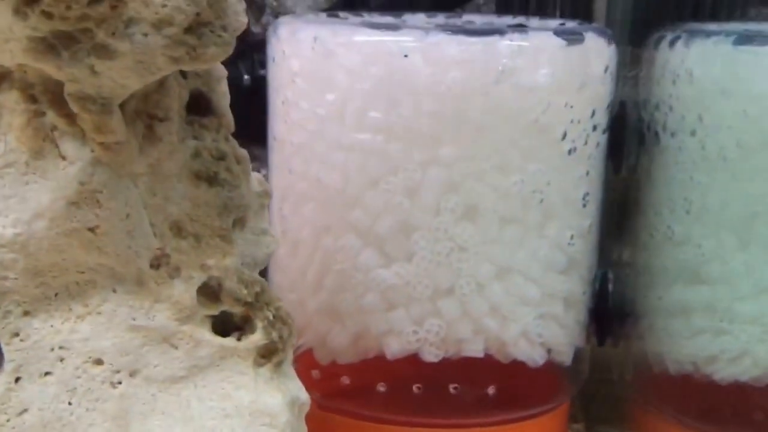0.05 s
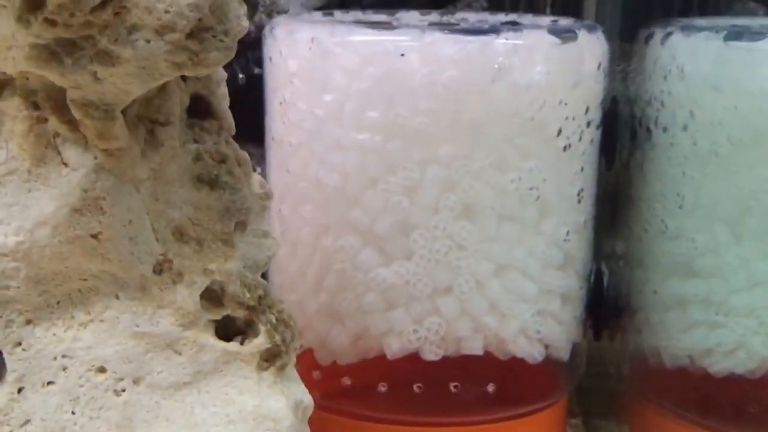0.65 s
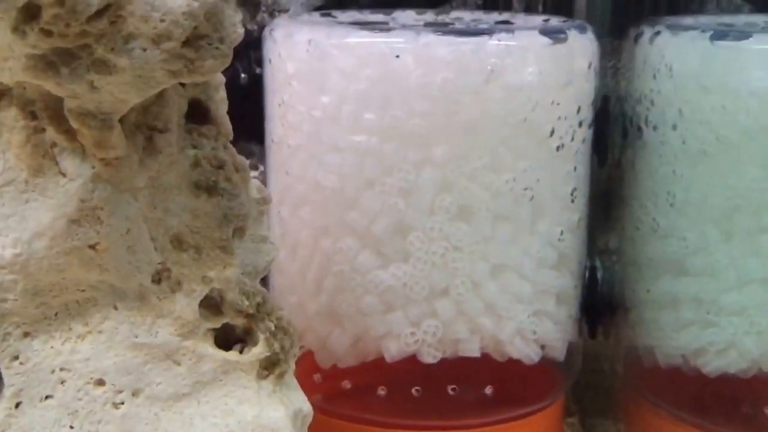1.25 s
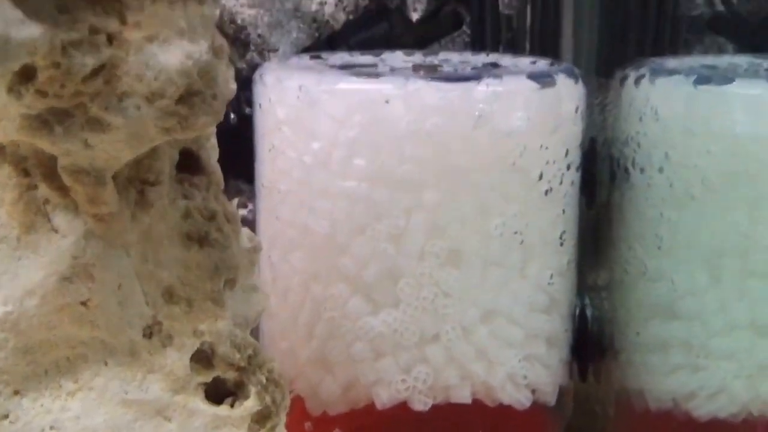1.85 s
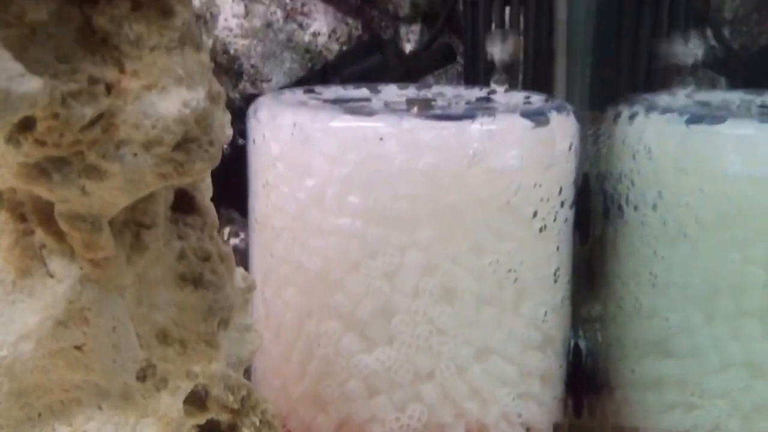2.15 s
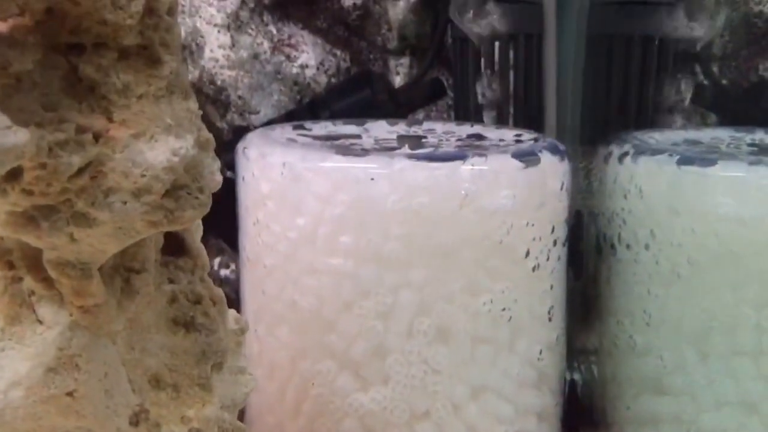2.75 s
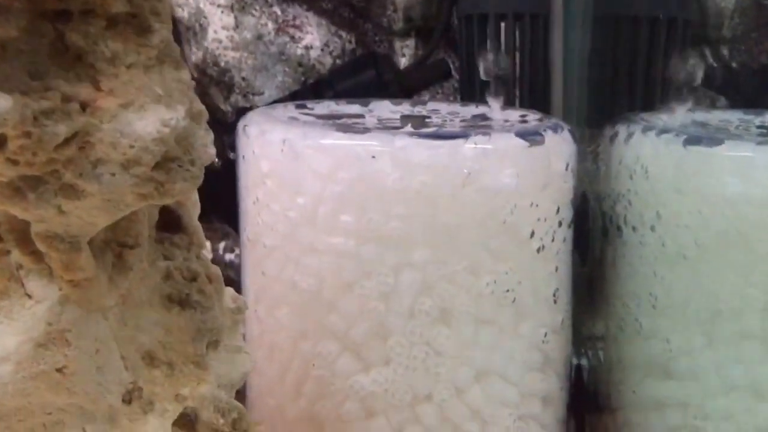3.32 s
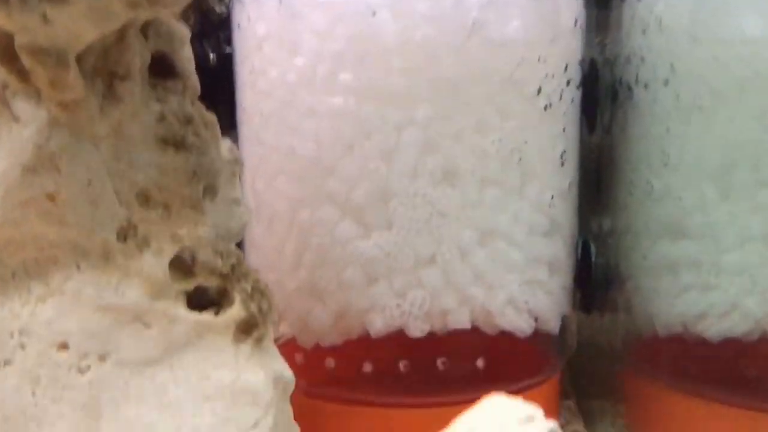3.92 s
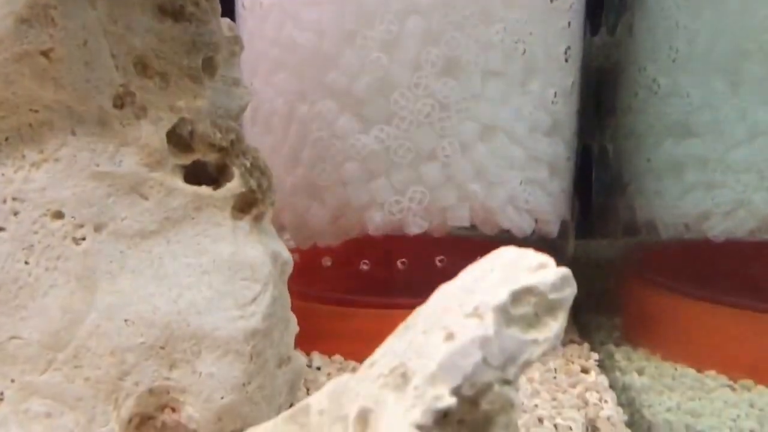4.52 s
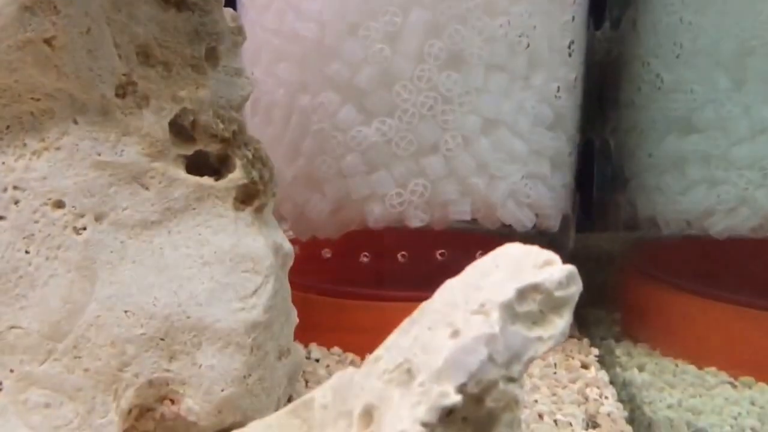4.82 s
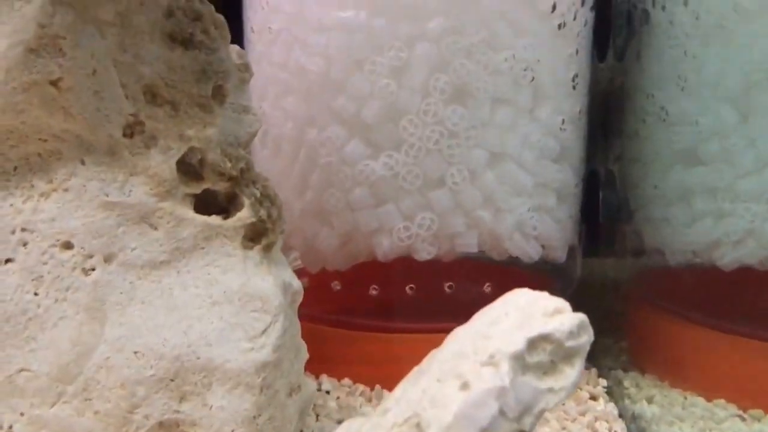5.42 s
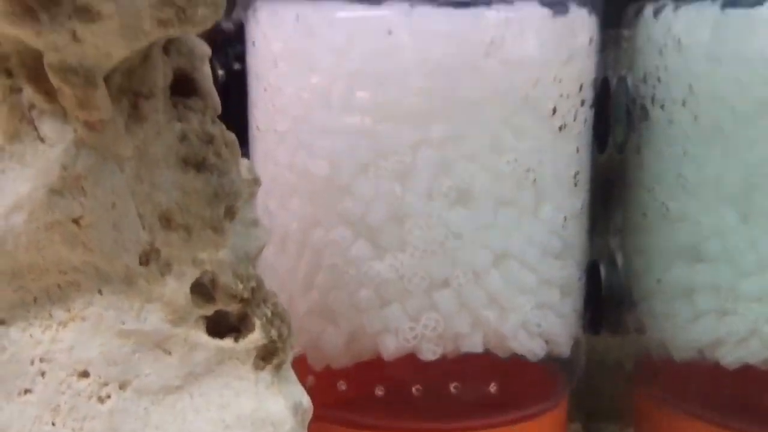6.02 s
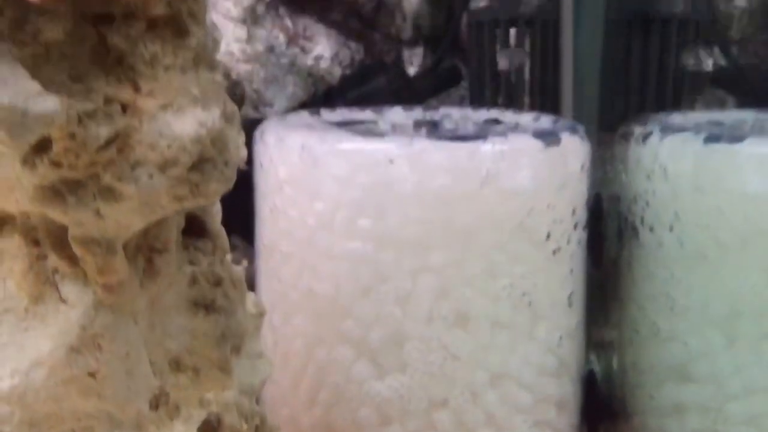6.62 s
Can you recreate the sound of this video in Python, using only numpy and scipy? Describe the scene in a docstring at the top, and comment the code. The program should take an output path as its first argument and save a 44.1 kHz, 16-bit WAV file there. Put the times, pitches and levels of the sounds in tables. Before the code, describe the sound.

Close drips and bubbles plink in a fish tank while water churns through the filter and a pump hums low in a quiet room.

```python
"""A quiet room, one microphone close to an aquarium with its filter running.
The mains pump hums, throbs and buzzes faintly through the glass. Drips and bursting bubbles plink
in the tank, and one pops with a sharp snap. Water glugs, gurgles and trickles through the filter,
each bubble ringing as a short damped tone. A faint even hiss lies behind it all."""
import sys
import numpy as np
from scipy import signal
from scipy.fft import rfft, irfft, next_fast_len
from scipy.io import wavfile
from scipy.ndimage import map_coordinates

SR = 44100
rng = np.random.default_rng(int(sys.argv[2]) if len(sys.argv) > 2 else 0)


def persist_wave(psi):
    """Save psi, clipped to +-1, as 16-bit WAV."""
    counts = np.round(np.clip(psi, -1, 1) * 32767).astype(np.int16)
    wavfile.write(sys.argv[1], SR, np.atleast_2d(counts).T)


N = 293789

MAINS_HZ, DRONE_DB, WAVER_HZ = 49.93, -41.5, 116.5
# The pump through the glass, low hum and higher buzz: multiple of the mains frequency, level/dB
HUM_PARTIALS = [(1, -65), (3, -59.5), (5, -71), (6, -70.5), (7, -76.5)]
BUZZ_PARTIALS = [(12, -81.5), (14, -77), (15, -82), (17, -84.5), (18, -81), (20, -78), (21, -80), (23, -80),
                 (24, -69.5), (25, -79), (26, -74.5), (27, -81), (41, -83), (42, -93.5), (43, -92)]
def pump():
    """Mains hum, strongest at twice the mains rate; a wavering tone just above it beats against it."""
    t = np.arange(N) / SR
    turn = 2 * np.pi * MAINS_HZ * t + 0.0093 * wobble(2.0)
    tone = lambda order: np.sqrt(2) * np.sin(order * turn + 2 * np.pi * rng.random())
    drone_db = DRONE_DB - hum_dips()
    drone = amp(drone_db) * tone(order=2)
    partials = sum(amp(db + 1.1 * wobble(6)) * tone(order) for order, db in HUM_PARTIALS + BUZZ_PARTIALS)
    waver = amp(1.6 * wobble(6)) * np.sin(2 * np.pi * WAVER_HZ * t + .9 * wobble(4))
    throb = amp(drone_db - 10) * waver
    return drone + partials + throb


# Brief dips in the pump's main hum: t/s, depth/dB, recovery/s
HUM_DIPS = [(.433, 12, 0.068), (.635, 14, 0.093), (1.11, 5.5, 0.032), (1.45, 14, 0.01), (1.585, 15, .012)]
def hum_dips(fall_s=0.011):
    """How many dB the main hum is down: each dip falls quickly, then recovers."""
    t = np.arange(N) / SR
    return sum(depth * np.exp(-((t - s) / np.where(t < s, fall_s, recovery)) ** 2)
               for s, depth, recovery in HUM_DIPS)


# Drips in the tank, close to the microphone: t/s, level/dB, f/Hz, length/s
TANK_DRIPS = [(0.029, -39.5, 1968, 0.012), (.762, -59, 2224, 0.026), (0.975, -34.5, 2010, 0.0038),
              (1.026, -50, 2267, 0.017), (1.089, -55, 2470, .012), (1.144, -45, 3600, 0.0069),
              (1.3264, -47, 2530, 0.013), (1.3337, -36.5, 1840, 0.015), (1.671, -45, 1320, .009),
              (1.769, -63, 5220, 0.0092), (1.845, -60, 3020, .012), (2.147, -49.5, 3346, 0.0083),
              (2.825, -48.5, 1990, 0.026), (3.026, -51, 2380, 0.018), (3.057, -58, 1592, 0.037),
              (3.689, -49, 2800, 0.013), (3.928, -56, 3210, 0.016), (4.215, -38, 2290, 0.0091),
              (4.409, -46.5, 3350, .009), (4.477, -57, 1800, .015), (4.511, -53.5, 2230, 0.014),
              (4.570, -60, 3140, .015), (4.718, -53, 1430, .013), (4.776, -55.5, 1793, .026),
              (4.815, -46.5, 1940, 0.011), (4.964, -55.5, 6850, .0044), (5.140, -50, 1858, 0.016),
              (5.723, -54.5, 2060, 0.01), (6.038, -53, 1420, 0.014), (6.394, -53.5, 3090, 0.014),
              (6.45, -53, 2513, 0.02)]
def drips():
    """Drips plink in the tank, with faint droplets between them."""
    return plinks(TANK_DRIPS + droplets(), splash=0.45)


# Spectrum of a drip's splash on the surface: f/Hz, relative level/dB
SPLASH_SPECTRUM = [(3000, -1), (5000, 3), (9000, -6), (13000, -5), (15700, -7)]
def splashes(t60_s=0.039, full_hz=3100, db_per_octave=21):
    """Each drip hits the surface with a short bright splash, strongest for the small high ones."""
    envelope, t = np.zeros(N), np.arange(SR // 20) / SR
    for s, db, hz, _ in TANK_DRIPS:
        low_pitch_db = db_per_octave * min(np.log2(hz / full_hz), 0)
        add(envelope, s, amp(db - 17 + low_pitch_db - 60 * t / t60_s))
    return envelope * noise(SPLASH_SPECTRUM)


def droplets(per_s=3, centre_hz=1518, length_s=0.012):
    """Rows of faint droplets at random moments, more of them when the trickle is strong."""
    chance = np.cumsum(amp(curve(TRICKLE_LEVEL)))
    rows = []
    for when, softness, pitch in rng.uniform(-1, 1, (int(per_s * N / SR), 3)):
        s = np.searchsorted(chance, chance[-1] * abs(when)) / SR
        rows.append((s, -63 - 1.5 * softness, centre_hz * 2 ** (0.067 * pitch), length_s))
    return rows


# Air pockets inside the filter: t/s, level/dB, f/Hz, length/s
FILTER_GLUGS = [(.674, -44.5, 628, 0.013), (.980, -48, 606, 0.014), (1.296, -52.5, 656, .025),
                (1.970, -40, 268, 0.0093), (2.264, -52, 588, 0.016), (2.425, -42.5, 264, 0.016),
                (2.469, -37.5, 278, 0.0096), (2.760, -38, 257, 0.0087), (2.785, -48, 576, 0.022),
                (3.060, -54.5, 610, 0.041), (3.298, -48, 603, 0.015), (4.324, -41.5, 367, .007)]
def glugs():
    """Big air pockets ring low and briefly."""
    return plinks(FILTER_GLUGS, splash=.35)


def plinks(rows, splash, sag_octaves=0.1, attack_s=0.0012, typical_length_s=0.013):
    """For each row a bubble sings and sags in pitch; the splash around it roughens and widens the tone."""
    out, n = np.zeros(N), np.arange(SR // 12)
    t = n / SR
    onset = 1 - np.exp(-t / attack_s)
    for s, db, hz, length in rows:
        age = t / length
        unrest = min(typical_length_s / length, 1)  # long-ringing bubbles are steadier and purer
        pitch = hz * 2 ** (-sag_octaves * unrest ** 2 * (np.minimum(age, 1.2) - .35))
        phase = 2 * np.pi * np.cumsum(pitch) / SR
        jitter = [np.interp(t * hz * 0.365, n, knots) for knots in rng.standard_normal((2, len(n)))]
        noise_band = jitter[0] * np.sin(1.06 * phase) + jitter[1] * np.cos(1.06 * phase)
        tone = np.sin(phase) + splash * np.sqrt(unrest) * noise_band
        add(out, s, amp(db) * onset * np.exp(-.5 * age - age ** 4) * tone)
    return out


# Bubble films bursting at the surface: t/s, level/dB
FILM_SNAPS = [(.590, -64), (0.629, -67), (0.9658, -47.5), (0.9762, -46.5)]
# Their spectrum: f/Hz, relative level/dB
SNAP_SPECTRUM = [(1500, -17), (4500, -14), (5600, -2), (7200, 0), (8600, 6.5), (10500, -4.5), (12000, -3),
                 (13300, -22), (16000, -18)]
def snaps(t60_s=.018):
    """A tearing bubble film gives a bright tick of a few milliseconds."""
    envelope, t = np.zeros(N), np.arange(SR // 20) / SR
    for s, db in FILM_SNAPS:
        add(envelope, s, amp(db - 60 * t / t60_s))
    return envelope * noise(SNAP_SPECTRUM)


# How hard the water churns inside the filter: t/s, relative level/dB
CHURN_LEVEL = [(0, 1.5), (.7, 0), (1.3, 3), (1.8, -1.5), (3.1, 1), (4.1, -0.5), (4.6, 0.5), (5.6, -2),
               (6.3, 2.5), (6.66, 0.5)]
# Spectrum of its rush: f/Hz, relative level/dB
RUSH_SPECTRUM = [(20, -26), (32, -16), (42, 6.5), (65, 8), (105, 8), (135, 7), (160, 2), (215, -0.5),
                 (300, -17), (400, -7), (490, -13.5), (620, -15.5), (820, -21.5), (970, -13.5),
                 (1400, -25.5), (2500, -34.5)]
def gurgle():
    """Churning water makes a soft rush and three sizes of bubbles, louder as the churning grows."""
    churn_db = curve(CHURN_LEVEL)
    rush = amp(-54.0 + .3 * churn_db + 1.25 * wobble(9)) * noise(RUSH_SPECTRUM)
    large = bubbles(per_s=130, centre_hz=235, spread=.25, cycles=3, size_db=2.8)
    middling = bubbles(per_s=150, centre_hz=619.8, spread=0.089, cycles=5.8, size_db=2.5)
    small = bubbles(per_s=100, centre_hz=1057, spread=0.2006, cycles=7.8, size_db=4.0)
    return (rush + amp(-59.0 + .3 * churn_db) * large + amp(-68.0 + churn_db) * middling
            + amp(-70.5 + 0.19 * churn_db) * small)


# The trickle on the tank's surface, faint at the microphone: t/s, level/dB
TRICKLE_LEVEL = [(0, -74), (.5, -69.5), (.76, -66), (1.3, -68), (1.6, -72.5), (3, -71.5), (3.8, -71.5),
                 (4.5, -69), (5.3, -79), (6.66, -72)]
def trickle():
    """A thin stream patters, fizzes and rings the tank; at its strongest it throws a bright spray."""
    strength_db = curve(TRICKLE_LEVEL)
    patter = bubbles(per_s=420, centre_hz=2113, spread=0.344, cycles=3.9, size_db=4)
    fizz = noise([(900, -4), (1500, -10.5), (3500, -10), (6000, -9)])
    spray = bubbles(per_s=240, centre_hz=3323, spread=0.039, cycles=14, size_db=1)
    spray_db = -73.0 + 3.9 * (strength_db - strength_db.max())
    return amp(strength_db) * unit(tank(patter + fizz)) + amp(spray_db) * spray


def bubbles(per_s, centre_hz, spread, cycles, size_db):
    """A swarm of bubbles at rms 1: damped tones that rise a little as they fade."""
    total = int(per_s * N / SR)
    when, size = rng.random((total, 2)).T
    hz = centre_hz * np.exp(spread * rng.standard_normal((total, 1)))
    n = np.arange(SR // 25)
    age = hz * n / SR / cycles
    envelope = np.exp(-age) * (1 - np.exp(-4 * age))
    ring = envelope * np.sin(2 * np.pi * cycles * age * (1 + 0.021 * age))
    gain = amp(size_db * np.minimum(-np.log(1 - size), 3.5))
    index = (when * N).astype(int)[:, None] + n
    return unit(np.bincount(index.ravel(), (gain[:, None] * ring).ravel(), N)[:N])


# Resonances of the tank: f/Hz, width/Hz, relative level/dB
TANK_MODES = [(1433, 95, 1.5), (1843, 100, -1), (2250, 480, -7), (3040, 710, -8)]
def tank(x):
    """The tank rings at a few damped resonances."""
    return filtered(x, lambda hz: sum(amp(db) * 1j * hz * width / (f ** 2 - hz ** 2 + 1j * hz * width)
                                      for f, width, db in TANK_MODES))


def glass(x, copies=8):
    """Close glass walls send back quick copies, each wavering as the water moves."""
    out = np.zeros(N)
    for delay_s in rng.uniform(0.00105, .013, copies):
        out += np.pad(x, (round(delay_s * SR), 0))[:N] * wobble(5) * np.exp(-delay_s / .02)
    return out


# Decay of the room around the microphone: f/Hz, t60/s
ROOM_DECAY = [(200, 0.44), (2000, 0.23), (10000, 0.049)]
def room(x):
    """A short diffuse tail, each frequency dying at its own speed."""
    hz, t, spectra = signal.stft(rng.standard_normal(SR // 2), SR, nperseg=256)
    tail = signal.istft(spectra * amp(-60 * t / along(ROOM_DECAY, hz)[:, None]), SR, nperseg=256)[1]
    return signal.fftconvolve(x, tail / np.linalg.norm(tail))[:N]


# Background at the microphone: f/Hz, relative level/dB
HISS_SPECTRUM = [(300, 3), (1300, 2.5), (1650, 2.5), (2300, 2), (2900, -1), (3600, 0.5), (4800, -5.5),
                 (5600, -3), (7600, -7.5), (9000, -6), (10500, -14.5), (11300, -10), (15700, -15.5)]
def hiss():
    """A faint even hiss."""
    return amp(-66.5) * noise(HISS_SPECTRUM)


def amp(db):
    """Decibels to gain."""
    return 10 ** (np.asarray(db) / 20)


def unit(x):
    """Scale to rms 1."""
    return x / np.sqrt(np.mean(x ** 2) + 1e-20)


def along(points, hz):
    """(f/Hz, value) points read on a log axis."""
    f, values = np.transpose(points)
    return np.interp(np.log(hz + 1), np.log(f + 1), values)


def curve(rows):
    """(t/s, value) rows, one value per sample."""
    return np.interp(np.arange(N) / SR, *np.transpose(rows))


def wobble(rate):
    """A smooth random curve, rate knots a second."""
    return map_coordinates(rng.standard_normal(int(N * rate / SR) + 4), [np.arange(N) * rate / SR])


def filtered(x, response):
    """Filter x by a response of frequency."""
    size = next_fast_len(N + SR // 2)
    return irfft(rfft(x, size) * response(np.fft.rfftfreq(size, 1 / SR)), size)[:N]


def noise(spectrum):
    """Coloured noise of rms 1."""
    return unit(filtered(rng.standard_normal(N), lambda hz: amp(along(spectrum, hz))))


def add(track, s, sound):
    """Mix a sound into a track at time s."""
    part = track[max(round(s * SR), 0):][:len(sound)]
    part += sound[:len(part)]


def scene():
    """Beside the tank: close plinks and their echoes, with the running water, the pump and the hiss."""
    dripping = drips()
    direct = dripping + glugs() + splashes() + snaps()
    close = direct + amp(-10.5) * glass(direct)
    room_tail = amp(-15) * room(close)
    tank_ring = amp(-12.5) * room(tank(dripping))
    return (close + room_tail + tank_ring + gurgle() + trickle() + pump() + hiss())[None]


def record(dry):
    """One microphone channel, with nothing kept above the recorder's band limit."""
    top_hz = 15720
    return filtered(dry[0], lambda hz: hz < top_hz)[None]


dry = scene()
out = record(dry)
persist_wave(out)
```